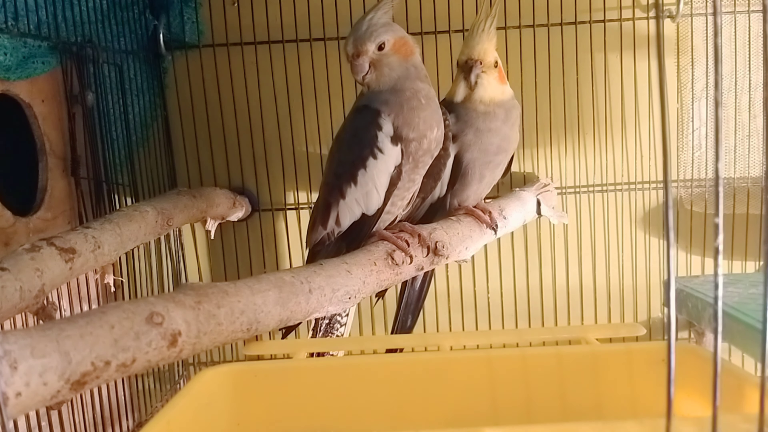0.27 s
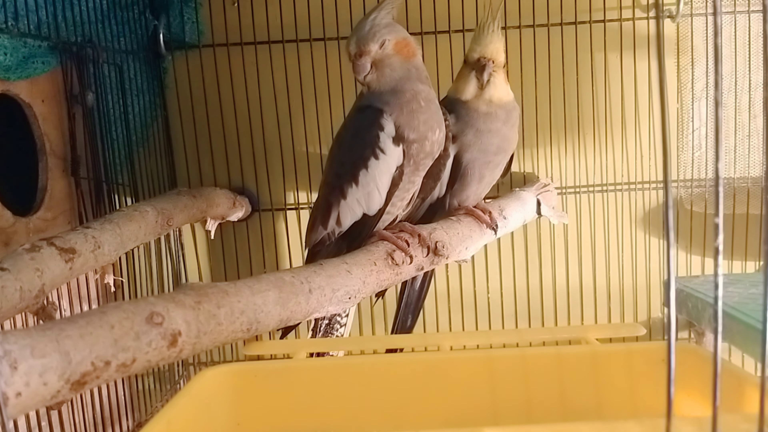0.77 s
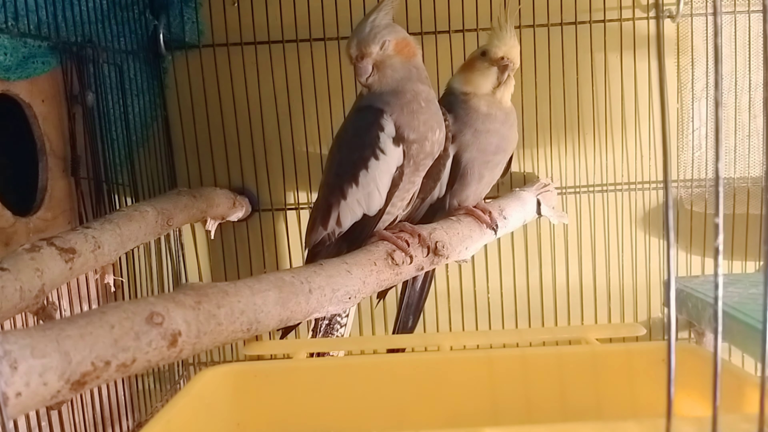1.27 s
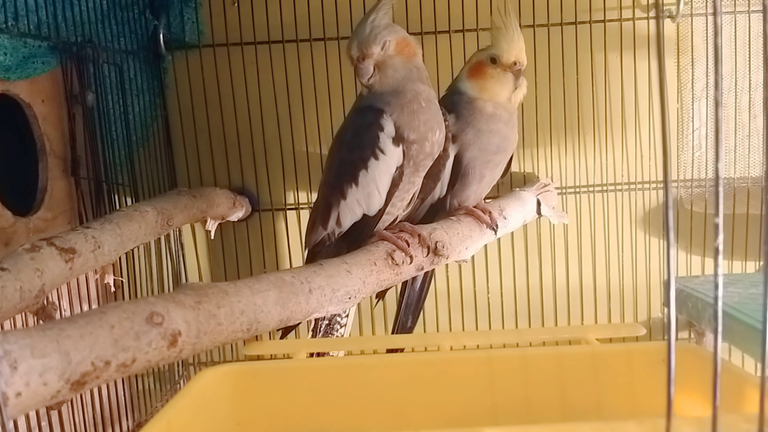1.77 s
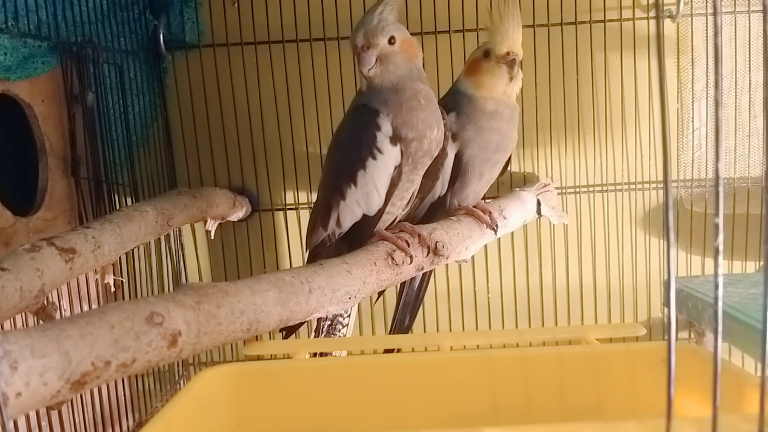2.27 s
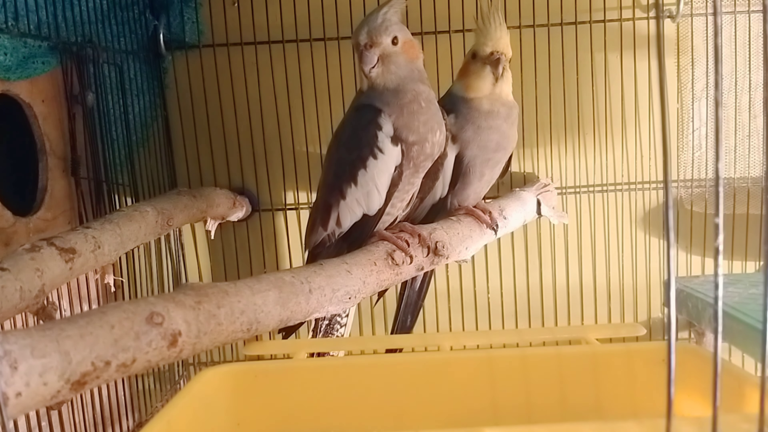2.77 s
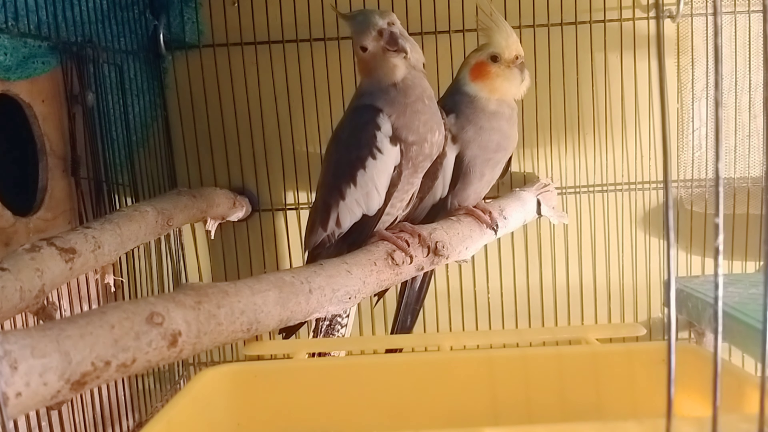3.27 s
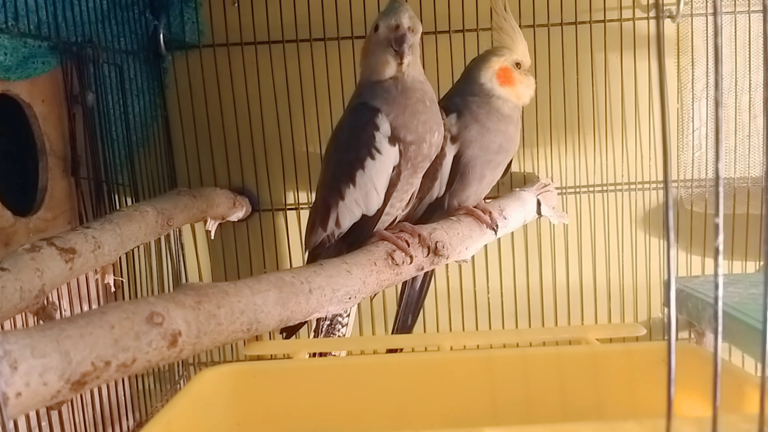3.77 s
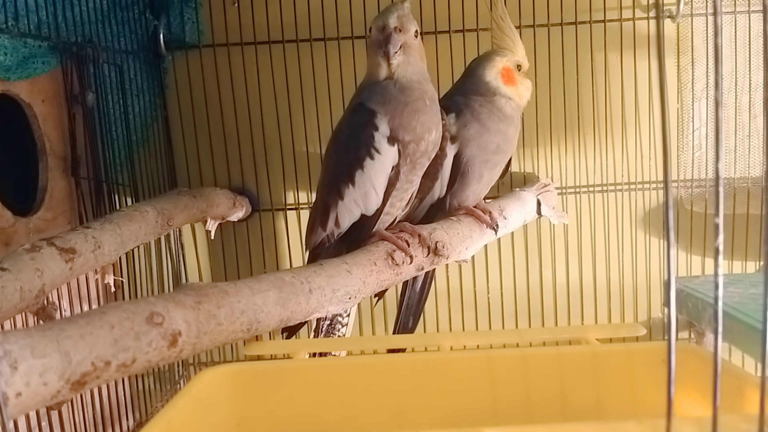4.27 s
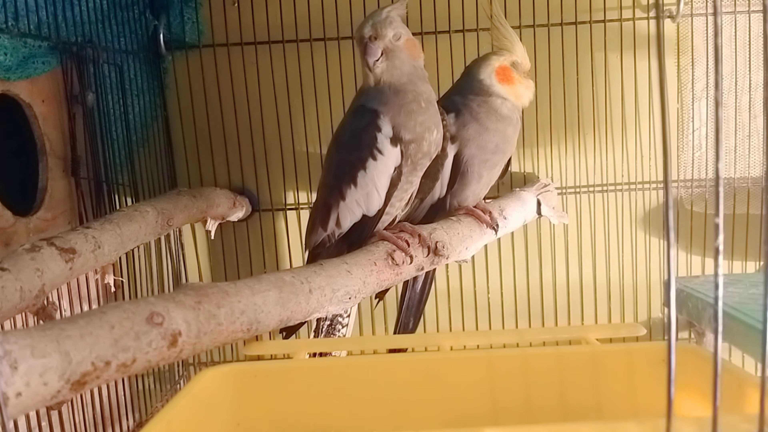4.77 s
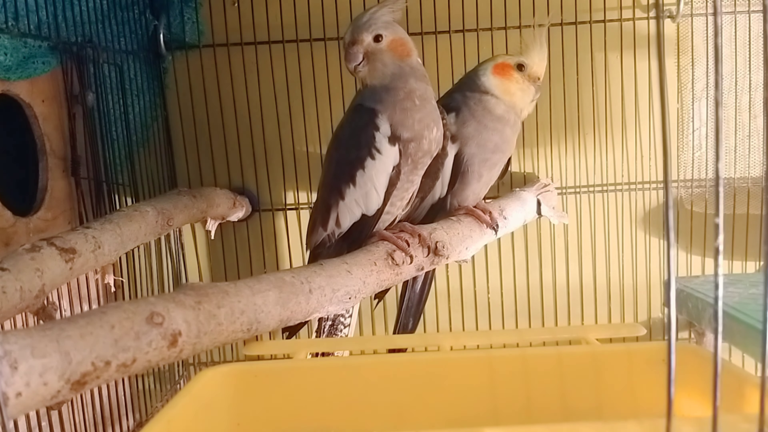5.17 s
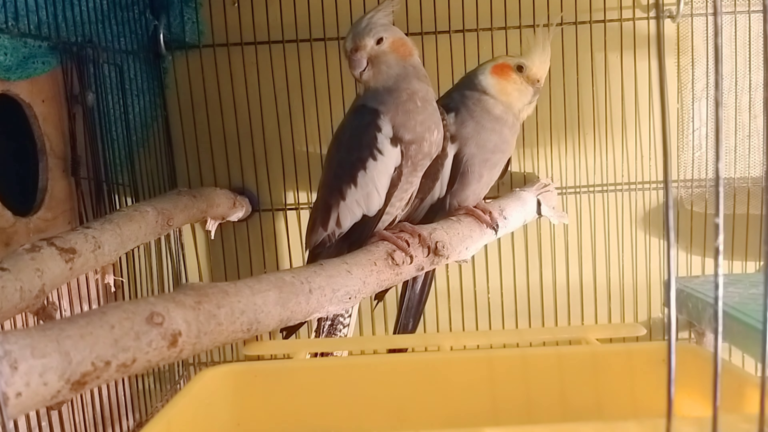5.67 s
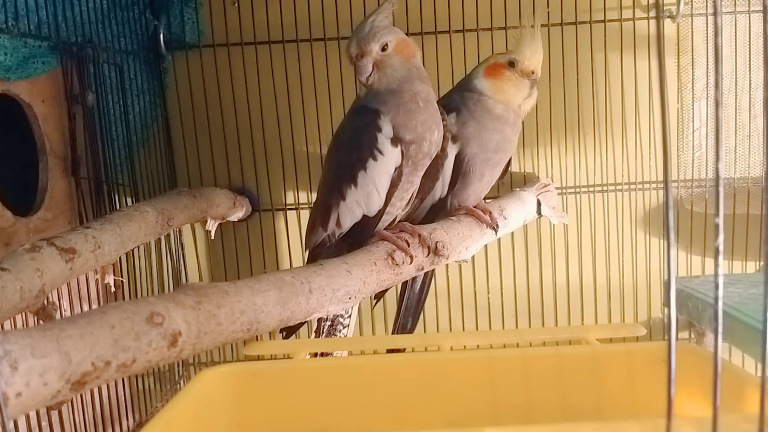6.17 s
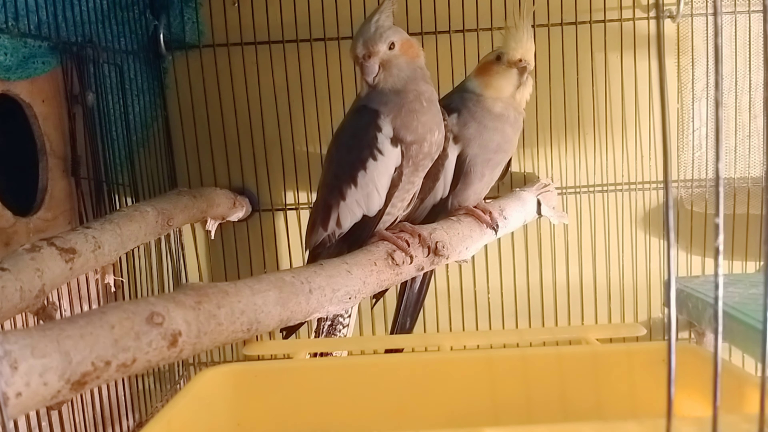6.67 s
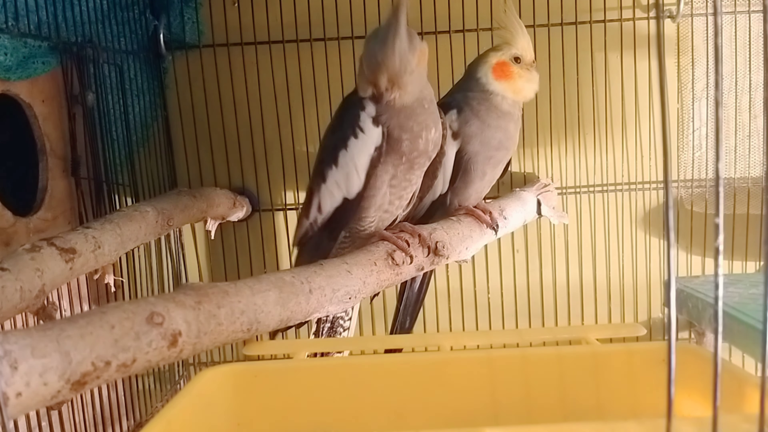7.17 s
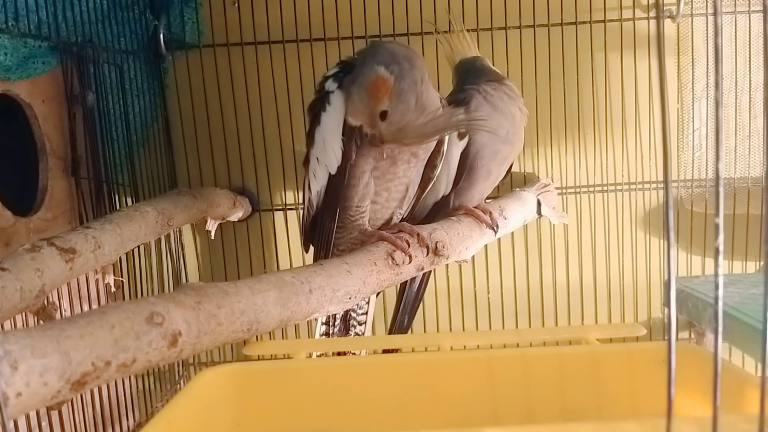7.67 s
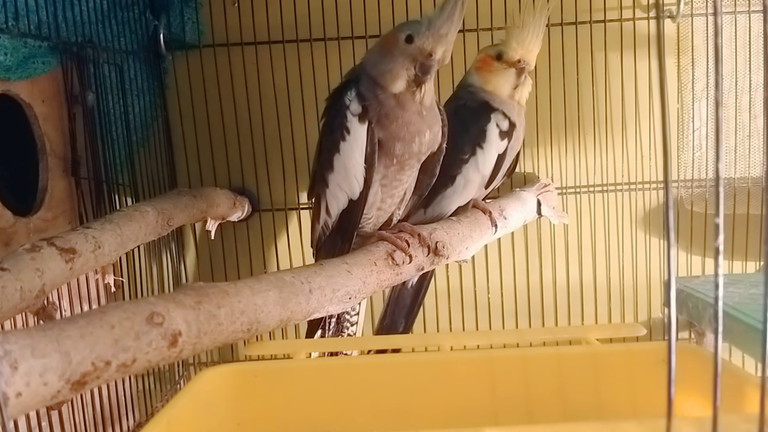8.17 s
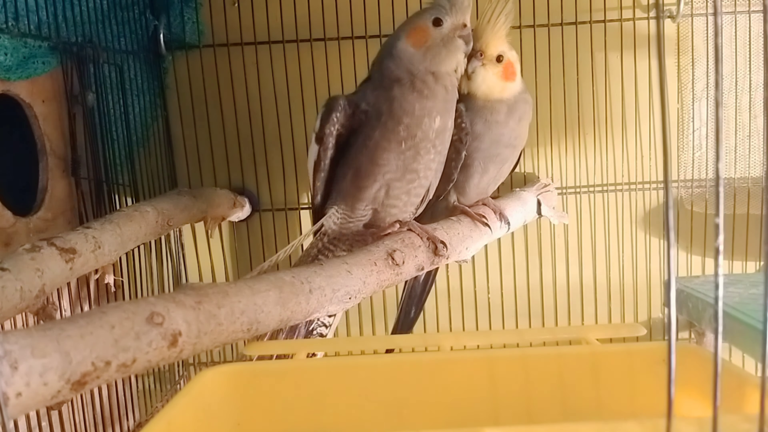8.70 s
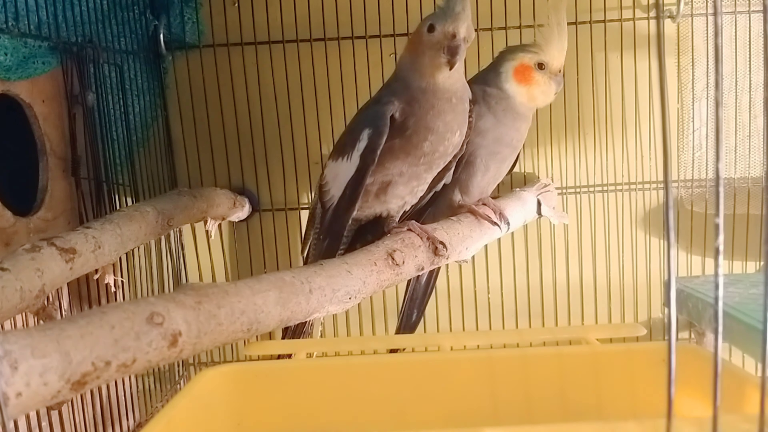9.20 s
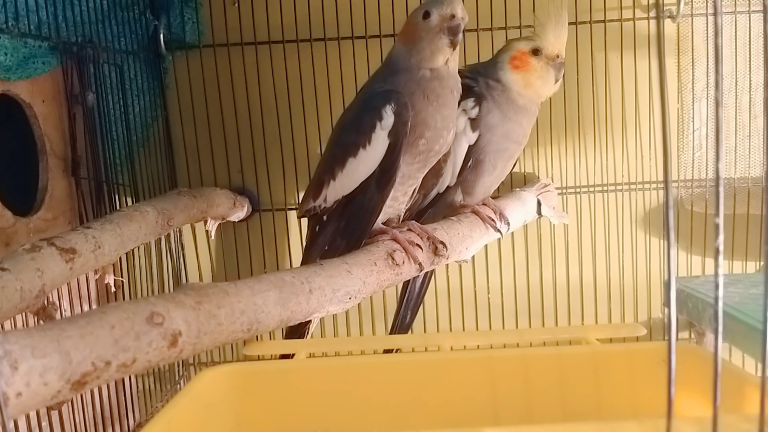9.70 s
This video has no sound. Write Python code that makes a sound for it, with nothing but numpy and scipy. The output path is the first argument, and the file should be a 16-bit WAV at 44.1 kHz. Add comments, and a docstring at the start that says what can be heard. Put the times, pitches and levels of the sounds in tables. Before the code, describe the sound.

Dry, very high claw rasps in quick runs over steady room hiss, with tiny ticks and squeaks, then a brief cage clatter and dull perch bumps.

```python
"""Two cockatiels on a perch

Two cockatiels shift and preen on a wooden perch in a wire cage, in a quiet room. Claws rasp on the bark
in quick runs: shaped noise with narrow resonances. Small ticks and squeaks are ragged, gliding tones.
Wires, a clatter against the cage and dull bumps on the perch ring as fading tones, the last two with
bursts of noise. Steady shaped noise makes the room and the feathers; faint whines and a hum come and go."""
import sys
import numpy as np
from scipy import signal
from scipy.fft import rfft, irfft
from scipy.io import wavfile
from scipy.ndimage import map_coordinates

SR = 44100
rng = np.random.default_rng(int(sys.argv[2]) if len(sys.argv) > 2 else 0)


def store_wav(level_fs):
    """Save 16-bit WAV to argv[1]."""
    pcm = np.round(np.clip(np.atleast_2d(level_fs), -1, 1) * 32767)
    wavfile.write(sys.argv[1], SR, pcm.T.astype(np.int16))


N = 438354  # length in samples
TIME = np.arange(N) / SR  # seconds
HZ = np.maximum(np.arange(N // 2 + 1) * SR / N, 1)  # frequencies of the spectrum, never zero

# Level of the room noise before its overall gain. Each row: time in seconds, level in dB.
ROOM_LEVEL = [(0.0, -56.5), (0.45, -60), (1.25, -59), (2.0, -58), (2.45, -57), (2.85, -58.5), (3.48, -58.5),
              (3.77, -57), (4.95, -58), (5.09, -57), (5.59, -58), (5.81, -56), (6.37, -59.5), (6.87, -54.5),
              (8.03, -58), (8.25, -57), (9.08, -59), (9.94, -57.5)]
# Broad colour of the room noise. Each row: frequency in Hz, relative strength in dB per Hz.
ROOM_COLOUR = [(30, -22.5), (120, -29.5), (280, -30.5), (400, -17.5), (540, -4), (850, -2), (1250, 1.5),
               (1600, 2), (2100, -1), (3300, 2), (5000, -4), (8000, -7), (15000, -8.5)]
# Hollow resonances of the cage. Each row: frequency in Hz, width in Hz, lift in dB.
CAGE_PEAKS = [(545, 40, 5), (646, 31, 6.5), (727, 23.4, 13), (1028, 54, 3.5), (1067, 40, 4),
              (1467, 160, 6.5), (1597, 45, 5), (1747, 26, 6.5), (1956, 108, 9), (2374, 160, 6.5),
              (3360, 79, 0.5), (3080, 74, 2)]
# Level of the feather rustle before its overall gain. Each row: time in seconds, level in dB.
RUSTLE_LEVEL = [(0.0, -53.5), (0.69, -60.5), (1.3, -64.5), (1.65, -55.5), (2.1, -59.5), (2.3, -57),
                (2.45, -54), (2.8, -61.5), (3.1, -57.5), (3.49, -59), (3.85, -62.5), (4.2, -62),
                (4.35, -50.5), (4.73, -63.5), (5.2, -58), (5.48, -68), (5.95, -55), (6.14, -63),
                (7.17, -56.5), (7.5, -51.5), (7.8, -60.5), (8.36, -57), (8.78, -61.5), (9.66, -56),
                (9.94, -68)]
# Broad colour of the feathers. Each row: frequency in Hz, relative strength in dB per Hz.
FEATHER_COLOUR = [(400, -50), (3000, -35.5), (6000, -2.5), (7500, -6), (10000, -1), (12000, 3.5),
                  (15400, 2)]
# After a stroke the feathers settle: level relative to the stroke (dB), time to fall by 60 dB (s).
SETTLE_DB, SETTLE_T60_S = -38, 1.3
# Faint thin whines. Each row: start in seconds, length in seconds, level in dB, pitch in Hz.
WHINES = [(-1.5, 9, -71, 735), (1.14, .08, -54, 1815), (0.5, 0.17, -62, 1745), (1.29, .08, -56.5, 1920),
          (1.7, 0.063, -58, 1740), (4, 2.1, -72, 950), (4.236, 0.16, -59.5, 960), (4.24, 0.17, -59, 4100),
          (4, 0.15, -65, 3200), (4.5, .55, -62.5, 1765), (5.101, 0.33, -63, 1603), (6, 1.3, -67, 1757),
          (8, 0.22, -65, 1760), (8.5, .2, -58.5, 1560), (8.88, 0.24, -63, 1510)]

# Thin ticks. Each row: start in seconds, level in dB.
TICKS = [(-.012, -44.5), (0.212, -47), (1.944, -47), (3.632, -45), (3.767, -48), (3.824, -38.5),
         (5.716, -44.5), (5.836, -44), (5.968, -47.5), (7.097, -42), (7.209, -45), (7.345, -57),
         (7.394, -40), (8.4, -45.5), (8.662, -44.5), (9.896, -44.5)]
TICK_S, TICK_HZ = 0.043, 11850  # time scale of the pressure (s), middle pitch (Hz)

# A foot scuffs the wood without a rasp. Each row: start in seconds, level in dB.
SCUFFS = [(.105, -64), (0.554, -56.5), (1.16, -62), (1.32, -61), (1.385, -64), (1.608, -57.5), (2.4, -57.5),
          (3.195, -61), (3.66, -62), (3.581, -58), (3.755, -61), (3.82, -76), (3.95, -58), (4.03, -80),
          (4.39, -62), (4.46, -61), (4.876, -56.5), (5.008, -58.5), (5.28, -72), (5.645, -56.5),
          (5.715, -66), (6.025, -53), (6.346, -54), (6.53, -58.5), (7.275, -55), (7.33, -74), (7.424, -51),
          (7.703, -54.5), (8.29, -53), (8.354, -49), (9.43, -67)]
SCUFF_S = 0.031
# Colour of rubbed wood. Each row: frequency in Hz, relative strength in dB per Hz.
RUB_COLOUR = [(100, -36), (350, -29.5), (560, -6.5), (900, -5), (1500, -1), (2300, -3.5), (3400, -1),
              (5000, -6.5), (9000, -7)]
# The wood under a firm stroke (dB), and the share of a stroke's level that it follows.
RUB_DB, RUB_FOLLOWS = -54.5, 0.29

# Claw strokes. Each row: start in seconds, length in seconds, rasp level in dB, sharpness in dB,
# pitch in Hz.
SCRATCHES = [(0.042, 0.027, -44, 13, 11500), (0.103, 0.04, -40.5, -20, 11650),
             (0.342, 0.04, -43, -13, 11900), (0.565, 0.038, -50, 4, 11400), (0.674, 0.042, -45, 2, 11600),
             (0.785, 0.033, -31.5, -3, 11800), (0.87, 0.034, -31.5, -3, 11800),
             (0.999, 0.061, -53.5, 0, 11200), (1.142, 0.045, -43, -5, 12000), (1.452, 0.06, -54, 4, 11300),
             (1.692, 0.035, -45, 8, 11500), (1.78, 0.063, -45, 4, 11660), (1.864, 0.053, -46, 13, 11900),
             (2.038, 0.033, -33, -2, 11440), (2.124, 0.034, -31.5, -1, 11670), (2.222, 0.03, -33, 1, 11280),
             (2.315, 0.03, -31.5, -4, 11530), (2.688, 0.036, -44.5, -2, 11560),
             (2.828, 0.026, -48.5, -14, 11460), (3.18, 0.061, -44.5, 10, 11600),
             (3.272, 0.023, -44.5, -7, 11400), (3.561, 0.032, -47.5, 2, 11200),
             (3.841, 0.057, -45.5, 2, 11550), (4.08, 0.034, -32.5, 0, 11450), (4.162, 0.033, -31, 0, 11770),
             (4.272, 0.035, -30.5, -2, 11440), (5.016, 0.05, -43, 18, 11700),
             (5.101, 0.047, -43.5, 12, 11800), (5.131, 0.045, -44, 5, 11150), (5.2, 0.037, -44, 17, 11800),
             (5.228, 0.041, -41, 5, 11540), (5.275, 0.063, -45.5, 11, 11800), (5.73, 0.038, -53, 1, 11600),
             (6.771, 0.061, -39.5, 12, 11860), (6.889, 0.03, -38.5, 18, 12000),
             (7.229, 0.046, -44, -4, 11500), (7.319, 0.035, -31.5, -4, 11290),
             (7.412, 0.029, -28, 4, 11760), (8.068, 0.047, -42.5, 6, 11900),
             (8.165, 0.033, -41.5, 9, 11400), (8.308, 0.034, -31.5, 5, 11760),
             (8.526, 0.027, -33.5, 32, 11320), (9.063, 0.028, -42.5, 7, 11400),
             (9.573, 0.027, -32.5, 2, 11320), (9.66, 0.035, -32, 6, 11400), (9.742, 0.03, -30.5, 0, 11400)]
# Colour of a claw on bark, before the pitch shift. Each row: frequency in Hz, strength in dB per Hz.
RASP_COLOUR = [(400, -60), (3000, -46.5), (5500, -28), (6900, -8.5), (8000, -13.5), (9400, -16),
               (10500, -5.5), (11500, -3.5), (12500, -2), (14000, -2), (15200, -4.5), (16500, -24.5)]
# Its narrow resonances, before the pitch shift. Each row: frequency in Hz, width in Hz, lift in dB.
RASP_PEAKS = [(7200, 190, 6.5), (7820, 150, 5), (8630, 130, 11), (9980, 200, 8.5), (11400, 200, 12),
              (12350, 350, -3), (13100, 220, 7.5), (13880, 220, 10.5), (14500, 150, 1.5), (14800, 200, 7.5)]
# The stroke pitch that leaves the resonances in place (Hz), and how they sink in a stroke (share per s).
RASP_HZ, RASP_SAG_PER_S = 11490, 0.22
FIRM_DB = -32  # rasp level of a firm stroke
# Lower hiss of a firm stroke (dB); it grows with a sharper edge and with a lighter touch (dB per dB).
HISS_DB, HISS_PER_SHARP, HISS_PER_LIGHT = -0.5, 0.61, 0.17
# Faint grazes between the strokes: mean level (dB), most they stray from it (dB), length (s).
GRAZE_DB, GRAZE_SPREAD_DB, GRAZE_S = -55, 2, 0.025

# The clearest tiny squeaks. Each row: start in seconds, level in dB, pitch in Hz.
SQUEAKS = [(.06, -59, 5900), (.12, -53, 2680), (.285, -60, 4370), (.467, -56, 9060), (.475, -59, 10200),
           (.53, -56, 10500), (.597, -50, 9870), (.995, -54.5, 4260), (1.146, -51, 7630),
           (2.545, -67, 4750), (2.56, -57, 9250), (2.94, -50, 9150), (3.18, -59, 4700), (3.585, -52, 2950),
           (3.757, -54, 2760), (4.658, -50.5, 1604), (5.148, -58, 6130), (5.245, -58, 6150),
           (5.944, -51, 1630), (7.709, -55.5, 2650), (8.164, -51, 7270), (8.25, -54.5, 3840),
           (8.69, -59, 4080), (8.36, -55, 3870)]
# Brushes against the wires. Each row: start in seconds, level in dB, pitch in Hz.
WIRES = [(.36, -62, 7900), (4.29, -69, 7951), (4.291, -62, 10360), (4.29, -67, 11500), (4.292, -60, 11919),
         (7.44, -62, 3400), (7.439, -61, 7000), (7.441, -60.5, 8300), (7.44, -62, 10500)]
# Small gritty taps of a beak or claw on wood. Each row: start in seconds, level in dB, pitch in Hz,
# time to fall by 60 dB in seconds.
TAPS = [(1.984, -41, 1520, 0.028), (5.737, -47.5, 1990, 0.11), (7.498, -49.5, 1500, 0.044),
        (8.369, -56, 1840, 0.038)]
# A hollow hum. The one row: start in seconds, length in seconds, level in dB, pitch in Hz, width in Hz.
HUM = (6, 5, -74.5, 630, 83.5)

# Contacts of the clatter. Each row: start in seconds, grind in dB relative to the other contacts,
# crack in dB, ping of the bar in dB.
CLATTER = [(6.6796, -9, -34.5, -30), (6.688, -1.5, -52, -35), (6.692, -0.5, -51.5, -40),
           (6.699, -5, -44, -40), (6.706, 6.5, -36.5, -32), (6.711, 0.5, -54, -45), (6.725, -12, -54, -40),
           (6.733, -17, -49, -39)]
# What the clatter rings with. Each row: frequency in Hz, relative level in dB,
# time to fall by 60 dB in seconds.
CLATTER_MODES = [(1030, -25, 0.14), (1107, -3, 0.16), (1166, -2, 0.14), (1240, -3, 0.09), (1310, -3, 0.06),
                 (1450, 12, 0.055), (1960, 11.5, 0.036), (2040, -5, 0.073), (2420, -4, 0.068),
                 (2510, -5, 0.07), (2735, 0.5, 0.078), (3360, -5.5, 0.05), (3880, -15, 0.035),
                 (4870, -8.5, 0.048)]
# Colour of a crack. Each row: frequency in Hz, relative strength in dB per Hz.
CRACK_COLOUR = [(100, -30), (400, -29), (800, -16), (2000, 22), (2800, 21.5), (3500, 14.5),
                (5500, 12.5), (11000, 13), (15500, 9.5)]
GRIND_T60_S = 0.029

# Dull bumps on the perch. Each row: start in seconds, level in dB, pitch in Hz,
# time to fall by 60 dB in seconds, thud in dB, softness of the contact in seconds.
BUMPS = [(6.9575, -43, 572, 0.098, -49, 0.0036), (6.9605, -27, 800, 0.018, -35.5, .0025),
         (7.031, -41, 770, 0.067, -37.5, 0.0027), (9.664, -26, 634, 0.056, -29.5, .012)]
# Colour of a thud. Each row: frequency in Hz, relative strength in dB per Hz.
THUD_COLOUR = [(50, -24), (200, -16), (400, -22), (600, 3), (1300, 12), (2000, 1), (3200, -14), (6000, -23)]

CUTOFF_HZ = 15550


def from_db(db):
    """Turn decibels into gain."""
    return 10 ** (np.asarray(db) / 20)


def rms_one(x):
    """Scale a sound so that its average strength (rms) is one."""
    return x / np.sqrt(np.mean(x ** 2) + 1e-20)


def add(out, start, sound):
    """Mix a sound in at a time in seconds, dropping what lies outside the scene."""
    at = int(start * SR)
    sound, at = sound[max(0, -at):], max(0, at)
    out[at:at + len(sound)] += sound[:max(0, N - at)]


def during(x, start, envelope):
    """Take the stretch of a running sound that lies under an envelope."""
    places = max(0, int(start * SR)) + np.arange(len(envelope))
    return np.take(x, places, mode="wrap") * envelope


def level(curve):
    """Gain over time from a curve of seconds and dB."""
    return from_db(np.interp(TIME, *np.transpose(curve)))


def drift(rate):
    """Smoothed noise that wanders by chance with an rms of one; a higher rate in Hz wanders faster."""
    r = np.exp(-2 * np.pi * rate / SR)
    return rms_one(signal.lfilter([1], [1, -2 * r, r * r], rng.standard_normal(N)))


def flutter(width_hz):
    """Slow complex noise that smears a tone into a ragged band; its two parts share an rms of one."""
    low = signal.butter(2, width_hz / 2, fs=SR, output="sos")
    a, b = rms_one(signal.sosfilt(low, rng.standard_normal((2, N))))
    return a + 1j * b


def ragged_tone(band, start, envelope, pitch):
    """A tone of changing pitch in Hz, made uneven by a flutter band."""
    turns = np.cumsum(pitch) / SR
    return np.real(during(band, start, envelope) * np.exp(2j * np.pi * turns))


def friction(grain_db, grain_rate):
    """Noise of countless tiny slips that come in clumps, as its level wanders by chance."""
    return rng.standard_normal(N) * from_db(grain_db * drift(grain_rate))


def colour(x, spectrum, peaks=()):
    """Give a sound a broad spectrum with resonances standing on it; the rms becomes one."""
    hz, db = np.transpose(spectrum)
    level_db = np.interp(np.log(HZ), np.log(hz), db)
    for centre, width, lift_db in peaks:
        level_db = level_db + lift_db / (1 + (2 * (HZ - centre) / width) ** 2)
    return rms_one(irfft(rfft(x) * from_db(level_db), N))


def stroke(length, rise, tail_db, tail_t60):
    """Pressure of one stroke: a swelling bite, a slower release, then a faint tail in the room."""
    t = TIME[:SR // 3]
    bite = 1 - np.exp(-(t / (rise * length)) ** 1.5)
    release = np.exp(-(t / length) ** 3)
    tail = from_db(tail_db - 60 * t / tail_t60)
    return bite * np.hypot(release, tail)


def mode(hz, t60):
    """A struck object's tone: a sine of height one that falls by 60 dB in t60 seconds."""
    t = TIME[:SR]
    return np.sin(2 * np.pi * hz * t) * from_db(-60 * t / t60)


def between_bars(x, echo_gain, spread_s, count=10):
    """Short echoes from the cage comb the sound with many narrow peaks."""
    lags = (rng.uniform(0.05, 1, count) * spread_s * SR).astype(int)
    signs = rng.choice([-1, 1], count)
    return x + echo_gain * sum(sign * np.roll(x, lag) for sign, lag in zip(signs, lags))


def wandering(x, share, rate):
    """Slide the resonances of a steady noise slowly up and down by varying its playing speed."""
    return map_coordinates(x, [np.cumsum(1 + share * drift(rate))], order=5, mode="mirror")


def patchy(x, depth_db, rate, count=9):
    """Let each part of the spectrum swell and fade a little on its own."""
    spectrum, out = rfft(x), 0
    place = np.interp(np.log(HZ), np.log([600, 5000]), [0, count - 1])
    for k in range(count):
        part = irfft(spectrum * np.maximum(1 - abs(place - k), 0), N)
        out = out + part * from_db(depth_db * drift(rate))
    return rms_one(out)


def room_noise(gain_db):
    """Steady room noise, coloured by echoes and resonances of the cage that slide and flicker a little."""
    grain = friction(grain_db=1.12, grain_rate=18)
    room = colour(between_bars(grain, echo_gain=0.14, spread_s=0.02), ROOM_COLOUR, CAGE_PEAKS)
    room = wandering(room, share=0.004, rate=1)
    return from_db(gain_db) * level(ROOM_LEVEL) * patchy(room, depth_db=1.18, rate=4)


def feather_rustle(gain_db):
    """Fine friction of the feathers' barbs, following a level curve and stirred more by claw strokes."""
    barbs = friction(grain_db=1.6, grain_rate=14)
    feathers = colour(between_bars(barbs, echo_gain=0.19, spread_s=0.008), FEATHER_COLOUR)
    return np.hypot(from_db(gain_db) * level(RUSTLE_LEVEL), settling()) * feathers


def settling():
    """Each stroke ruffles the feathers by its strength; the rustle builds over a run and dies away."""
    power = np.zeros(N)
    for start, length, db, _, _ in SCRATCHES:
        fading_db = db + SETTLE_DB - 60 * TIME[:SR] / SETTLE_T60_S
        add(power, start + length, from_db(fading_db) ** 2)
    return np.sqrt(power)


def whines(waver, ragged):
    """Weak tones swell and fade, never quite steady in pitch or strength."""
    out, wobble = np.zeros(N), drift(9.4)
    band = (1 + ragged * flutter(width_hz=55)) / np.sqrt(1 + 2 * ragged ** 2)
    for start, length, db, hz in WHINES:
        swell = signal.windows.tukey(int(length * SR), 0.8)
        pitch = hz * (1 + waver * during(wobble, start, swell))
        add(out, start, from_db(db) * ragged_tone(band, start, swell, pitch))
    return out


def ticks(width_hz, glide, scrape_db):
    """A brief catch squeaks in a ragged band that sinks as pressure eases, over a weak broad scrape."""
    out, t, band = np.zeros(N), TIME[:SR // 3], flutter(width_hz)
    # differences between neighbouring samples favour the treble
    scrape = rms_one(np.diff(friction(grain_db=-7.0, grain_rate=130), prepend=0))
    pressure = stroke(TICK_S, rise=0.32, tail_db=-17, tail_t60=0.2)
    pitch = TICK_HZ * (1 + glide * (0.5 - np.minimum(t / TICK_S, 1)))
    for start, tick_db in TICKS:
        squeak = ragged_tone(band, start, pressure, pitch)
        rough = from_db(scrape_db) * during(scrape, start, pressure)
        add(out, start, from_db(tick_db) * (squeak + rough))
    return out


def wood_rub(tick_rub_db):
    """Strokes, ticks and scuffs stir the perch and cage, lower and softer; firmer strokes stir them more."""
    out = np.zeros(N)
    rub = colour(friction(grain_db=2.5, grain_rate=230), RUB_COLOUR, CAGE_PEAKS)
    touches = [(start, length, RUB_DB + RUB_FOLLOWS * (db - FIRM_DB))
               for start, length, db, _, _ in SCRATCHES]
    touches += [(start, TICK_S, tick_rub_db) for start, _ in TICKS]
    touches += [(start, SCUFF_S, db) for start, db in SCUFFS]
    for start, length, rub_db in touches:
        pressure = stroke(length, rise=0.16, tail_db=-1, tail_t60=0.35)
        add(out, start, from_db(rub_db) * during(rub, start, pressure))
    return out


def scratches():
    """A claw drags over bark, its resonances sinking; edge sets the top, edge and touch the lower hiss."""
    rasp = colour(friction(grain_db=1.5, grain_rate=860), RASP_COLOUR, RASP_PEAKS)
    top = irfft(rfft(rasp) / (1 + np.exp((13600 - HZ) / 450)), N)
    hiss = irfft(rfft(rasp) * np.exp(-((HZ - 7500) / 1000) ** 2), N)
    out, t = np.zeros(N), TIME[:SR // 3]
    for start, length, rasp_db, sharp_db, hz in list(SCRATCHES) + grazes():
        hiss_db = HISS_DB + HISS_PER_SHARP * sharp_db + HISS_PER_LIGHT * (FIRM_DB - rasp_db)
        pressure = stroke(length, rise=0.26, tail_db=-27, tail_t60=0.26)
        # top and hiss are already in the rasp once, hence the minus one
        shares = ((rasp, 1), (top, from_db(sharp_db) - 1), (hiss, from_db(hiss_db) - 1))
        contact = sum(share * during(part, start, pressure) for part, share in shares)
        # playing the contact faster or slower moves its resonances
        speed = hz / RASP_HZ + RASP_SAG_PER_S * (length / 2 - np.minimum(t, length))
        contact = map_coordinates(contact, [np.cumsum(speed)], order=5)
        # every stroke falls on another spot, so the nearby bars colour it anew
        echoed = between_bars(contact, echo_gain=0.18, spread_s=0.004)
        strength = np.sqrt(np.mean(pressure ** 2))
        add(out, start, from_db(rasp_db) * rms_one(echoed) * strength)
    return out


def grazes(count=22):
    """Faint strokes, one at a random moment in each equal slice of time, as rows like the claw strokes."""
    rows = []
    for k, (when, size, edge) in enumerate(rng.random((count, 3))):
        start = (k + when) / count * N / SR
        graze_db = GRAZE_DB + GRAZE_SPREAD_DB * (2 * size - 1)
        sharp_db = 5 * (2 * edge - 1)
        rows.append((start, GRAZE_S, graze_db, sharp_db, RASP_HZ))
    return rows


def squeaks(length, glide, ragged, faint_db, count=90):
    """Tiny ragged pips from beaks and claws, sinking slightly: a few clear ones among many faint high ones."""
    out, t = np.zeros(N), TIME[:SR // 3]
    band = (1 + ragged * flutter(width_hz=230)) / np.sqrt(1 + 2 * ragged ** 2)
    pressure = stroke(length, rise=0.12, tail_db=-11.0, tail_t60=0.16)
    faint = [(when * N / SR, faint_db + 3 * size, 8000 + 7000 * height)
             for when, size, height in rng.random((count, 3))]
    for start, db, hz in list(SQUEAKS) + faint:
        pitch = hz * (1 + glide * (0.5 - np.minimum(t / length, 1)))
        add(out, start, from_db(db) * ragged_tone(band, start, pressure, pitch))
    return out


def wires(t60):
    """Brushed cage wires sing on for a moment as fading tones."""
    out = np.zeros(N)
    for start, db, hz in WIRES:
        add(out, start, from_db(db) * mode(hz, t60))
    return out


def taps(width_hz, grit_db):
    """A light tap excites one broad resonance of the wood, with a little grit."""
    out, t, band = np.zeros(N), TIME[:SR // 4], flutter(width_hz)
    grit = colour(friction(grain_db=13, grain_rate=540), RUB_COLOUR, CAGE_PEAKS)
    for start, db, hz, t60 in TAPS:
        onset = 1 - np.exp(-t / 0.00089)
        decay = from_db(db - 60 * t / t60) * onset
        body = np.real(during(band, start, decay) * np.exp(2j * np.pi * hz * t))
        add(out, start, body + from_db(grit_db) * during(grit, start, decay))
    return signal.sosfilt(signal.butter(4, 600, "high", fs=SR, output="sos"), out)


def hum():
    """A narrow band of noise, heard as a hollow hum, swells and fades."""
    start, length, db, hz, width_hz = HUM
    edges = [hz - width_hz / 2, hz + width_hz / 2]
    band = signal.butter(2, edges, "band", fs=SR, output="sos")
    out, noise = np.zeros(N), rms_one(signal.sosfilt(band, rng.standard_normal(N)))
    swell = signal.windows.tukey(int(length * SR), 0.2)
    add(out, start, from_db(db) * during(noise, start, swell))
    return out


def clatter(ring_db, crack_t60):
    """A hard thing rattles along the cage: contacts crack, ping a bar, and grind to drive the modes."""
    grind, hits, t = np.zeros(N), np.zeros(N), TIME[:SR // 4]
    slips = rng.standard_normal(N)
    crack = colour(friction(grain_db=3, grain_rate=600), CRACK_COLOUR)
    for start, grind_db, crack_db, ping_db in CLATTER:
        add(grind, start, from_db(grind_db) * during(slips, start, from_db(-60 * t / GRIND_T60_S)))
        add(hits, start, from_db(crack_db) * during(crack, start, from_db(-60 * t / crack_t60)))
        add(hits, start, from_db(ping_db) * mode(hz=2710, t60=0.072))
    ring = np.zeros(N)
    for hz, db, t60 in CLATTER_MODES:
        driven = signal.oaconvolve(grind, mode(hz, t60)[:len(t)])[:N]
        ring += from_db(db) * rms_one(driven)
    high = signal.butter(6, 880, "high", fs=SR, output="sos")
    return signal.sosfilt(high, from_db(ring_db) * rms_one(ring) + hits)


def bumps(thud_t60):
    """A foot lands softly: one low mode of the perch and a short thud of noise."""
    out, thud, t = np.zeros(N), colour(rng.standard_normal(N), THUD_COLOUR), TIME[:SR]
    for start, db, hz, t60, thud_db, contact_s in BUMPS:
        ring = from_db(db) * mode(hz, t60)
        dull = from_db(thud_db) * during(thud, start, from_db(-60 * t / thud_t60))
        onset = 1 - np.exp(-(t / contact_s) ** 2)
        add(out, start, (ring + dull) * onset)
    return out


def scene():
    """The birds, the cage and the room, added together in one channel."""
    background = room_noise(gain_db=1.5) + feather_rustle(gain_db=-0.5)
    tones = whines(waver=0.004, ragged=0.9) + hum()
    claws = ticks(width_hz=860, glide=0.06, scrape_db=-6.5) + wood_rub(tick_rub_db=-59.5) + scratches()
    pips = squeaks(length=0.03, glide=0.008, ragged=0.56, faint_db=-63)
    wood_taps = taps(width_hz=620, grit_db=-5.5)
    cage = wires(t60=1.0) + clatter(ring_db=-53.5, crack_t60=0.072) + bumps(thud_t60=0.04)
    return (background + tones + claws + pips + wood_taps + cage)[None]


def record(dry):
    """Cut the very top of the treble steeply."""
    return irfft(rfft(dry) / np.sqrt(1 + (HZ / CUTOFF_HZ) ** 500), N)


dry = scene()
out = record(dry)
store_wav(out)
```